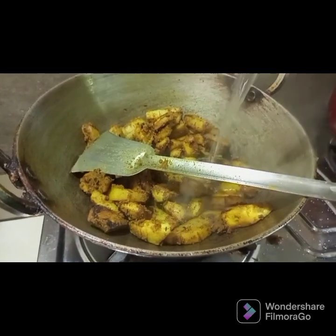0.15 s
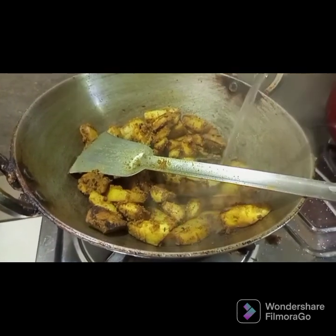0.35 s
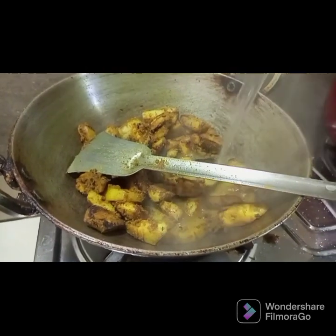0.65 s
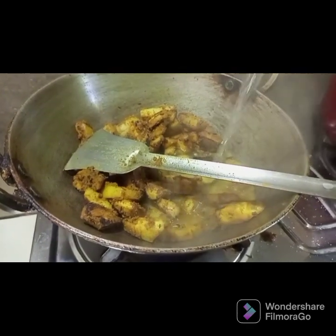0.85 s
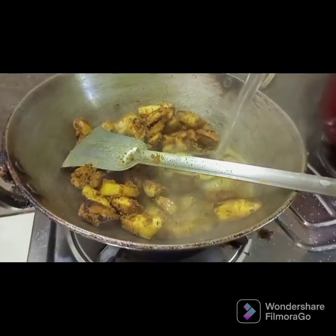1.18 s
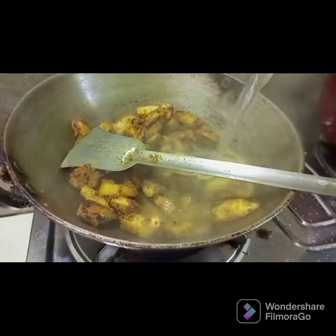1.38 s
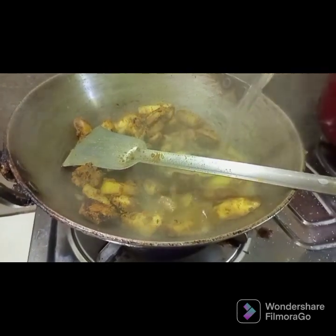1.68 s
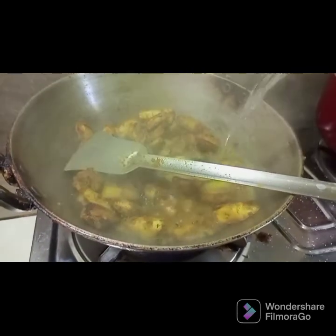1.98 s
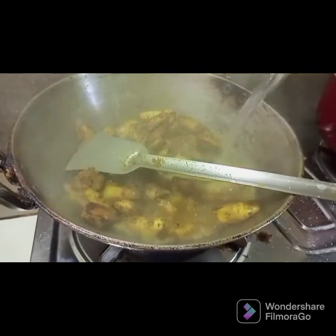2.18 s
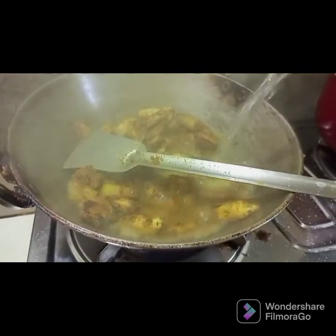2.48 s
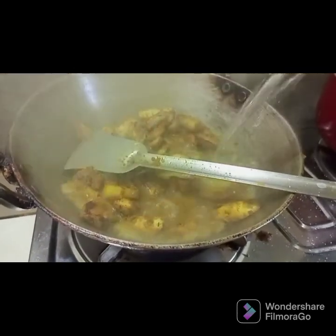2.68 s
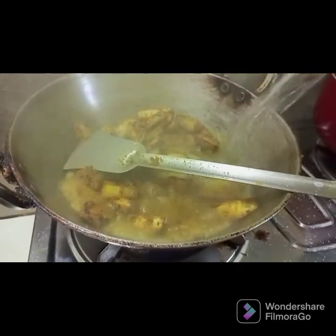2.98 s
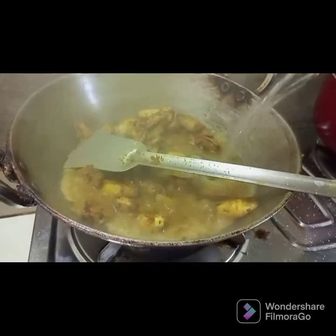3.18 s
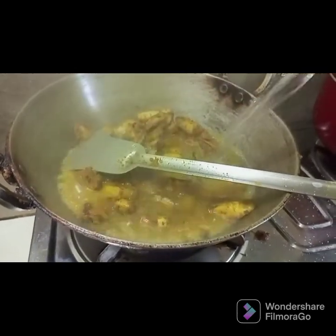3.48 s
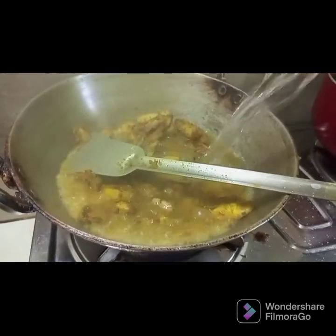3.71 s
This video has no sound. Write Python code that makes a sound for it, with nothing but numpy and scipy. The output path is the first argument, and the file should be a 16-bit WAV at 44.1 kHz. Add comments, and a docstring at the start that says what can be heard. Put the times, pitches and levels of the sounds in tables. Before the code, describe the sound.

A hot wok of fried vegetables sizzles and hisses as a thin stream of water splashes in with small bubbling plinks. Heard from just above the pan in a small kitchen, the sizzle slowly fades, flaring briefly twice.

```python
"""A thin stream of water runs into a hot wok of fried vegetables in a small kitchen, heard in mono.
From the start, over faint stove rumble and mains hum, water flashes to steam in a hiss and a dense,
spitting sizzle, while the stream splashes, rings the pan and traps bubbles that plink and plop.
After about a second the sizzle begins to fade as the pan cools, flaring briefly near 2.5 s and 3.7 s.
By the end the stream is softer too, and the finest fizz has held up best."""
import sys
import numpy as np
from scipy import signal
from scipy.fft import rfft, irfft, next_fast_len
from scipy.io import wavfile
from scipy.ndimage import uniform_filter1d, map_coordinates

SR = 44100
rng = np.random.default_rng(int(sys.argv[2]) if len(sys.argv) > 2 else 0)


def bounce(signal):
    """Save signal as a 16-bit WAV file at the path given by the first command-line argument."""
    frames = np.transpose(np.atleast_2d(signal))
    limited = np.clip(frames, -1, 1)
    pcm = np.round(limited * 32767).astype(np.int16)
    wavfile.write(sys.argv[1], SR, pcm)


N = 169785


def amp(db):
    """Decibels to gain."""
    return 10 ** (np.asarray(db) / 20)


def unit(x):
    """Scale to rms 1."""
    return x / np.sqrt(np.mean(x ** 2) + 1e-20)


def curve(rows):
    """A fader ride: (time_s, level_db) points to one level per sample."""
    return np.interp(np.arange(N) / SR, *np.transpose(rows))


def wobble(rate_hz):
    """A smooth random drift through rate_hz points a second."""
    return map_coordinates(rng.standard_normal(2048), [np.arange(N) * rate_hz / SR + 2], mode="wrap")


def filtered(x, response):
    """Filter x by a response given as a function of frequency."""
    size = next_fast_len(N + SR // 2)
    return irfft(rfft(x, size) * response(np.fft.rfftfreq(size, 1 / SR)), size)[:N]


def coloured(x, eq):
    """x through an EQ of (freq_hz, gain_db) points, at rms 1."""
    freq_hz, gain_db = np.transpose(eq)
    return unit(filtered(x, lambda hz: amp(np.interp(np.log(hz + 1), np.log(freq_hz), gain_db))))


def resonances(x, modes):
    """x rings a bank of (pitch_hz, width_hz, gain_db) resonators, at rms 1."""
    def response(f):
        return sum(amp(db) * 1j * f * width / (hz * hz - f * f + 1j * f * width)
                   for hz, width, db in modes)
    return unit(filtered(x, response))


def rush(patchy_db):
    """Noise that flickers in brief patches across the spectrum."""
    spectrum = signal.stft(rng.standard_normal(N), nperseg=512)[2]
    patches = uniform_filter1d(rng.standard_normal(spectrum.shape), size=7, axis=0)
    patches = uniform_filter1d(patches, size=8, axis=1)
    return signal.istft(spectrum * amp(patchy_db * unit(patches)), nperseg=512)[1][:N]


def pops(rate_hz, spread_db):
    """Randomly timed clicks of uneven size."""
    size = amp(spread_db * np.minimum(rng.exponential(size=N), 5))
    return (rng.random(N) < rate_hz / SR) * size * rng.choice([-1, 1], N)


def tone_swarm(lo_hz, hi_hz, cycles, spread_db, count):
    """Scattered short tones, each a damped sine with a life counted in cycles."""
    when, pitch, size, life = rng.random((count, 4)).T[:, :, None]
    age = np.arange(min(SR // 16, 3000000 // count))  # in samples
    turns = lo_hz * (hi_hz / lo_hz) ** pitch * age / SR
    gain = amp(-spread_db * np.log(size + np.exp(-4)))
    envelope = np.exp(-turns / (cycles * (.5 + life))) * (1 - np.exp(-turns / 2))
    ring = gain * envelope * np.sin(2 * np.pi * turns)
    position = (when * N).astype(int) + age
    return np.bincount(position.ravel(), ring.ravel(), N)[:N]


def large_bubble(start_s, pitch_hz, level_db, t60_s, attack_s, rise_per_s=0.19):
    """A soft swell into a wavering, fluttering tone that rises slightly as it dies."""
    t = np.clip(np.arange(N) / SR - start_s, 0, 1)
    phase = 2 * np.pi * pitch_hz * t * (1 + rise_per_s * t / 2) + 0.3 * wobble(90)
    flutter_db = 2.2 * wobble(130)
    swell = 1 - np.exp(-(t / attack_s) ** 2)
    return amp(level_db - 60 * t / t60_s + flutter_db) * swell * np.sin(phase)


def kitchen(x, t60_s=0.37, wet_db=-23):
    """Direct sound plus the short tail of hard walls."""
    t = np.arange(SR // 2) / SR
    tail = rng.standard_normal(len(t)) * amp(-60 * t / t60_s)
    return x + amp(wet_db) * signal.fftconvolve(x, tail / np.linalg.norm(tail))[:N]


# Burner rumble EQ: freq_hz, gain_db
BURNER_EQ = [(25, -49), (45, -10), (70, -7), (170, -1), (300, -15.5), (700, -5), (2000, -35.5)]
def stove(hum_hz=99.4):
    """The background bed: burner rumble and mains hum."""
    rumble = amp(-71) * coloured(rng.standard_normal(N), BURNER_EQ)
    hum = amp(-80) * np.sqrt(2) * np.sin(2 * np.pi * hum_hz * np.arange(N) / SR)
    return rumble + hum


# Fader ride of the stream: time_s, level_db
STREAM_RIDE = [(0, -46), (0.6, -46.5), (1.3, -47), (1.7, -46.5), (1.95, -48), (2.2, -47), (2.4, -49),
               (2.9, -51), (3.25, -51.5), (3.6, -53.5), (3.85, -53)]
# Splash EQ: freq_hz, gain_db
SPLASH_EQ = [(60, -41), (190, -12), (245, -20), (330, -30), (430, -25), (600, -17.5), (680, -10),
             (1000, -6.5), (1250, -3), (1600, -4.5), (1850, -2), (2300, 1.5), (3300, -8), (6000, -58)]
# Modes of the loaded pan: pitch_hz, width_hz, gain_db
PAN_MODES = [(314, 38, -11.5), (369, 54, -8), (468.7, 20, -3.5), (895, 40, 0.5), (1253, 66, -0.5),
             (1335, 35, 4.5), (1822, 45, 6.5), (2040, 110, -2), (2294, 120, 1), (2783, 28, 12.5),
             (3190, 41, -1), (3410, 72, 2.5), (3857, 96, 7)]
def stream():
    """The stream splashes, rings the pan and stirs in a froth of small bubbles."""
    splash = amp(-0.5) * coloured(rush(patchy_db=2.5), SPLASH_EQ)
    ring = amp(-3) * resonances(pops(rate_hz=1600, spread_db=1.0), PAN_MODES)
    bubbles = tone_swarm(1000, 3434, cycles=27, spread_db=1.5, count=700)
    froth = amp(-8.5) * coloured(kitchen(bubbles), SPLASH_EQ)
    return amp(curve(STREAM_RIDE) + 0.11 * wobble(12.1)) * (splash + ring + froth)


# Air modes in the hollow of the wok: pitch_hz, width_hz, gain_db
HOLLOW_MODES = [(302, 21, -3.5), (330, 33, -8), (381, 24, -4), (476, 11, 2.5), (510, 25, 1.5),
                (760, 53, -17), (905, 42, 3)]
def glugs():
    """Small gurgles merge into a low wash in the hollow of the wok, tucked under the stream's fader."""
    gurgles = tone_swarm(259.4, 912, cycles=6.4, spread_db=-0.3, count=500)
    return amp(curve(STREAM_RIDE) - 19.5) * resonances(gurgles, HOLLOW_MODES)


# Clear, bright bubbles: start_s, pitch_hz, level_db (before the boost), t60_s
PLINK_CUES = [(.012, 1250, -38.5, 0.063), (0.117, 1160, -48, 0.13), (.195, 882, -47.5, 0.13),
              (0.413, 1280, -41, .1), (.484, 897, -46, 0.096), (0.536, 1810, -43, 0.086),
              (.745, 873, -48, 0.07), (.843, 3920, -31, .1), (1.18, 3410, -36, 0.13),
              (1.364, 2024, -41, 0.16), (1.518, 1294, -46, 0.06), (1.777, 2740, -39, 0.12),
              (1.885, 890, -49, .11), (2.067, 1860, -39, 0.068), (2.073, 2190, -44.5, 0.13),
              (2.087, 1810, -39, .1), (2.147, 1735, -42, 0.081), (2.485, 2756, -38, 0.085),
              (2.538, 3110, -38, .09), (2.712, 1836, -45, 0.081), (2.952, 870, -51, 0.096),
              (3.155, 1890, -49, .1), (3.494, 2940, -45.5, 0.16)]
# Soft, low bubbles: start_s, pitch_hz, level_db
PLOP_CUES = [(0.656, 106, -53), (0.751, 157, -50), (1.293, 142, -48), (2.103, 87.5, -52), (2.931, 80, -50),
             (3.145, 90.5, -53)]
def plinks_and_plops(plink_boost_db=9):
    """Single large bubbles ring where the stream lands; the low plops stay dry."""
    plinks = sum(large_bubble(start_s, hz, db + plink_boost_db, t60_s, attack_s=0.012)
                 for start_s, hz, db, t60_s in PLINK_CUES)
    plops = sum(large_bubble(*cue, t60_s=0.096, attack_s=0.0091) for cue in PLOP_CUES)
    return kitchen(plinks) + plops


# Fader ride of the fizz: time_s, level_db
FIZZ_RIDE = [(0, -37), (0.6, -37.5), (1.05, -37.5), (1.6, -38.5), (2.1, -39.5), (2.42, -40.5),
             (2.52, -40.5), (2.75, -42), (3.15, -42.5), (3.62, -43), (3.71, -42), (3.76, -44.5),
             (3.85, -43)]
# Airy fizz EQ: freq_hz, gain_db
FIZZ_EQ = [(1500, -32), (3500, -12), (5000, -42), (6500, 0), (8200, -4.5), (9200, -1.1), (10200, -0.5),
           (11200, -3), (12050, -7), (12300, -10), (13800, -17.5), (14350, -11), (15000, -4.5),
           (15700, -12)]
def fizz():
    """The top end: the finest spray, crackling oil and faint, brief high whistling tones."""
    spray = amp(0.5) * coloured(rush(patchy_db=1.0), FIZZ_EQ)
    crackle = amp(-3.5) * coloured(pops(rate_hz=2800, spread_db=1.0), FIZZ_EQ)
    tones = tone_swarm(8000, 15600, cycles=220, spread_db=-2.5, count=400)
    whistles = amp(-16) * coloured(kitchen(tones), FIZZ_EQ)
    return amp(curve(FIZZ_RIDE) + 0.13 * wobble(23)) * (spray + crackle + whistles)


# Fader ride of the hiss: time_s, level_db
HISS_RIDE = [(0, -33), (0.4, -32.7), (0.58, -33.5), (0.7, -32), (0.85, -34), (1.15, -34.5), (1.5, -35.5),
             (1.8, -38), (2.1, -40.5), (2.43, -41), (2.5, -38), (2.64, -40), (2.73, -37), (2.79, -40.5),
             (3.2, -44), (3.62, -43.5), (3.76, -46), (3.85, -43)]
# Sharp hiss EQ: freq_hz, gain_db
HISS_EQ = [(2500, -28.5), (4400, -14), (5080, -14), (5350, 1.5), (6000, 3), (6600, -1), (7100, -1),
           (7600, -4.5), (8200, -11), (10000, -23), (14000, -22)]
# High modes of the metal bowl: pitch_hz, width_hz, gain_db
BOWL_MODES = [(4730, 23, -3), (4680, 28, -4), (5370, 120, 0), (5970, 86, 0), (5950, 120, 2.5),
              (6385, 44, 7.5), (7000, 72, -22)]
def hiss():
    """Water flashes off bare hot metal, fiercest at first; the bowl sings with it."""
    steam = amp(-4) * coloured(rush(patchy_db=1.8), HISS_EQ)
    spits = amp(-6) * coloured(pops(rate_hz=6000, spread_db=2.0), HISS_EQ)
    bowl = amp(-7) * resonances(pops(rate_hz=2600, spread_db=2), BOWL_MODES)
    return amp(curve(HISS_RIDE) + 0.19 * wobble(25.33)) * (steam + spits + bowl)


# Fader ride of the sizzle: time_s, level_db
SIZZLE_RIDE = [(0, -37), (0.3, -36), (0.6, -36), (0.82, -35.5), (1.2, -36.5), (1.35, -37.5), (1.65, -37.5),
               (2.0, -40.5), (2.43, -41), (2.54, -39), (2.68, -41), (2.82, -41), (2.97, -43), (3.35, -44.5),
               (3.62, -46), (3.7, -43), (3.76, -46), (3.85, -44.5)]
# Upper-mid sizzle EQ: freq_hz, gain_db
SIZZLE_EQ = [(900, -52), (2000, -20.5), (2900, -7), (3150, -4), (3500, -0.5), (4000, -2), (4350, -2.5),
             (4600, -8.5), (5100, -3.5), (6200, -27), (9000, -40)]
def sizzle():
    """Water boils among the vegetables: steam, bursting droplets and tiny ringing bubbles."""
    steam = amp(-1.5) * coloured(rush(patchy_db=1.5), SIZZLE_EQ)
    spits = amp(-8) * coloured(pops(rate_hz=7000, spread_db=2.0), SIZZLE_EQ)
    bubbles = tone_swarm(2200, 4800, cycles=54, spread_db=1.5, count=1200)
    singing = amp(-8) * coloured(kitchen(bubbles), SIZZLE_EQ)
    return amp(curve(SIZZLE_RIDE) + 0.19 * wobble(25.05)) * (steam + spits + singing)


def scene():
    """The mix as heard above the pan, the same in both channels."""
    mono = stove() + stream() + glugs() + plinks_and_plops() + fizz() + hiss() + sizzle()
    return np.array([mono, mono])


def record(dry, top_hz=15760):
    """A brick-wall low-pass on the master."""
    return np.array([filtered(channel, lambda hz: hz < top_hz) for channel in dry])


dry = scene()
out = record(dry)
bounce(out)
```